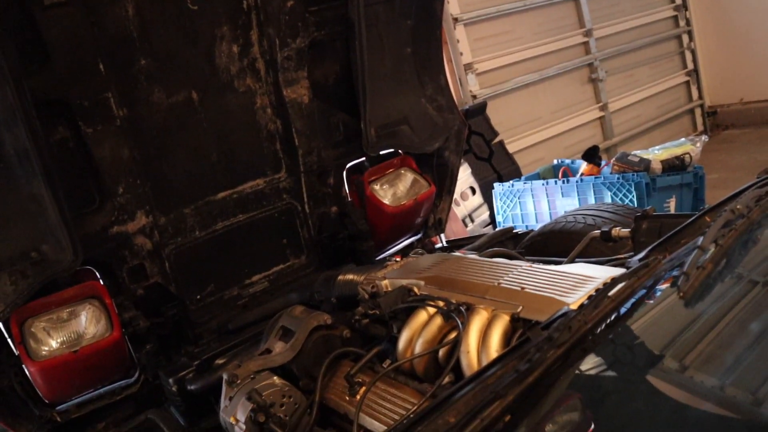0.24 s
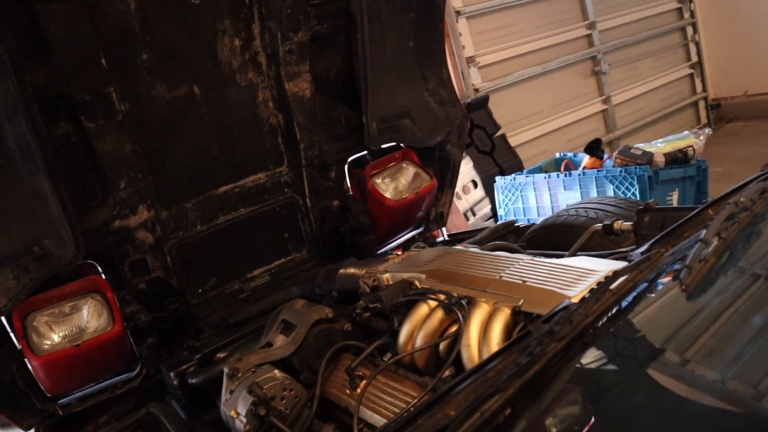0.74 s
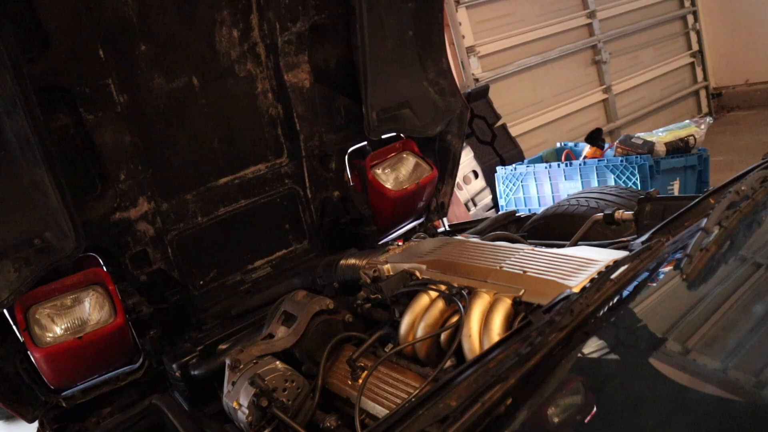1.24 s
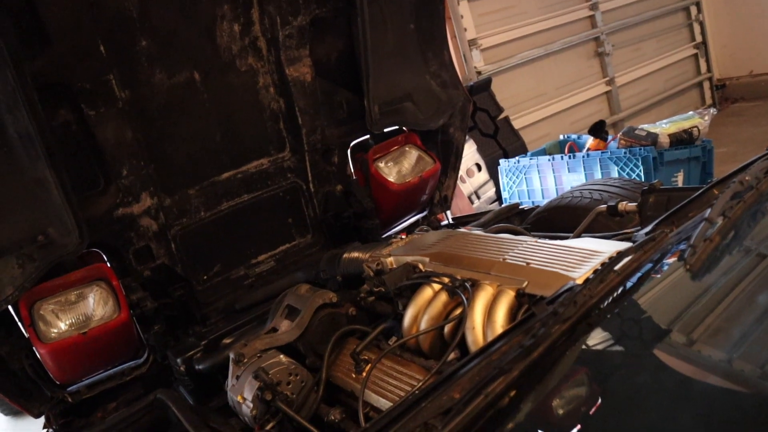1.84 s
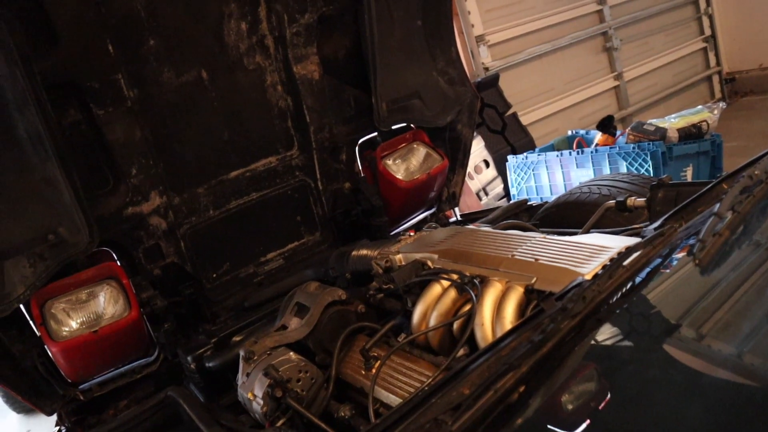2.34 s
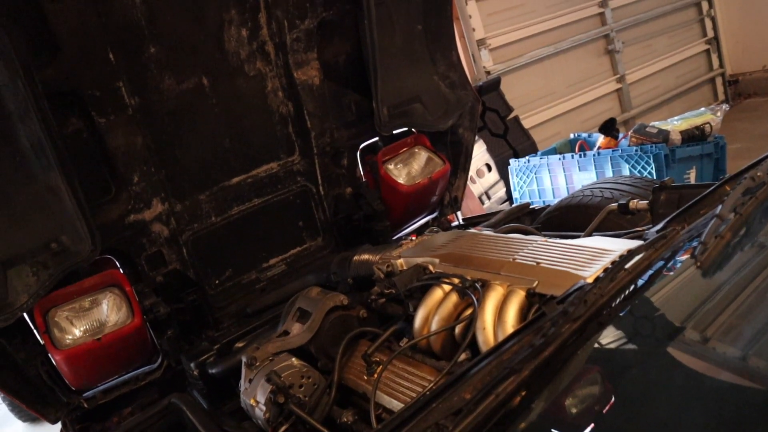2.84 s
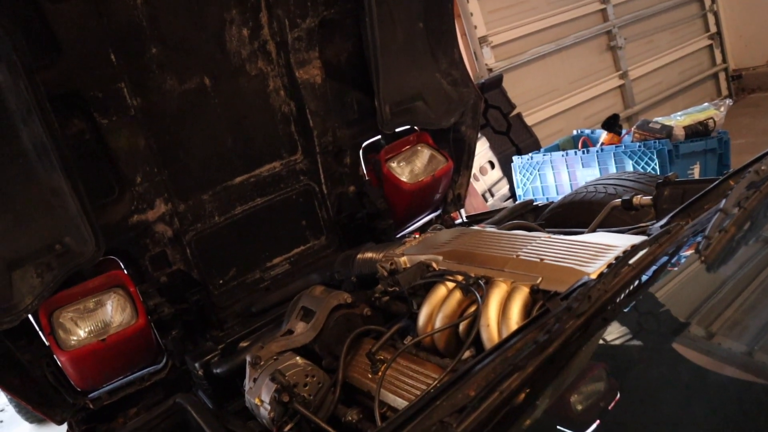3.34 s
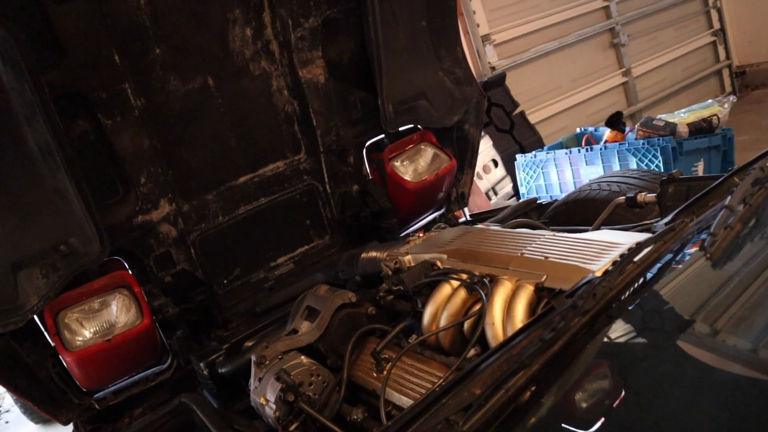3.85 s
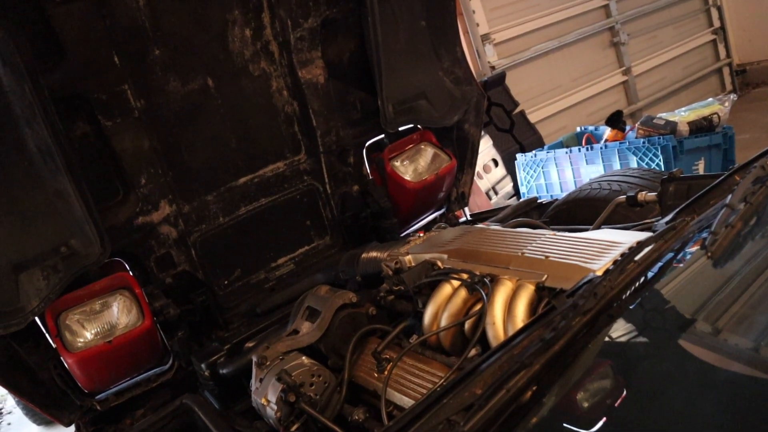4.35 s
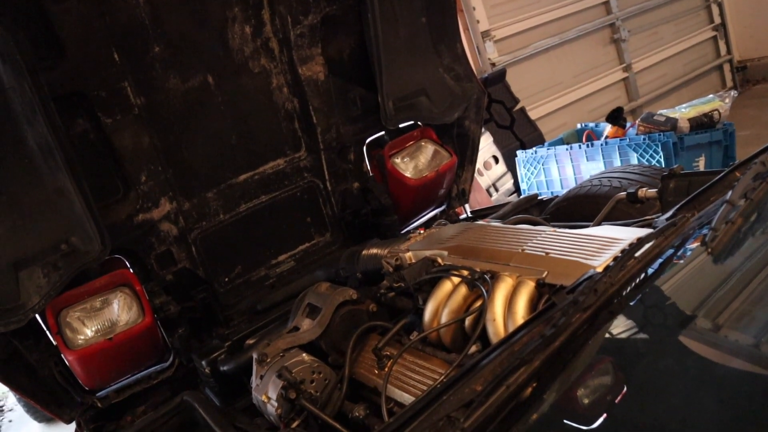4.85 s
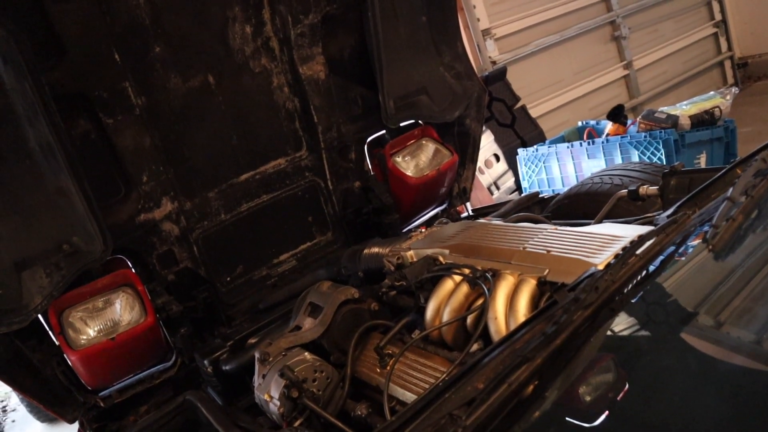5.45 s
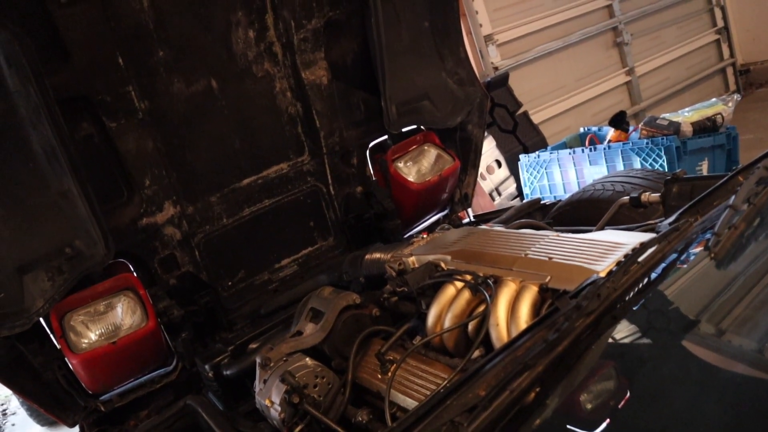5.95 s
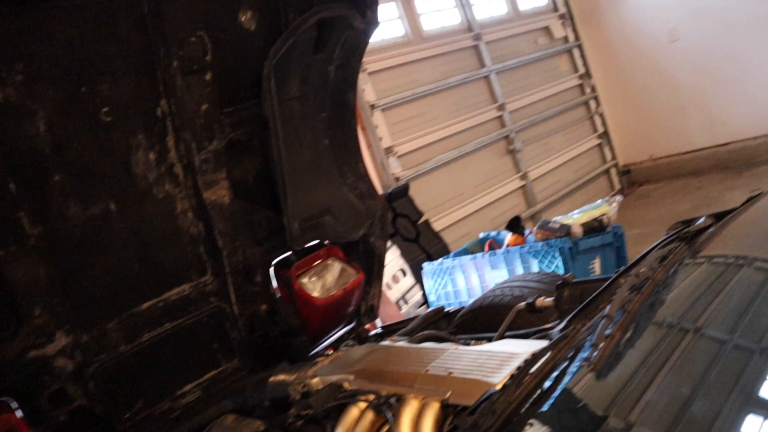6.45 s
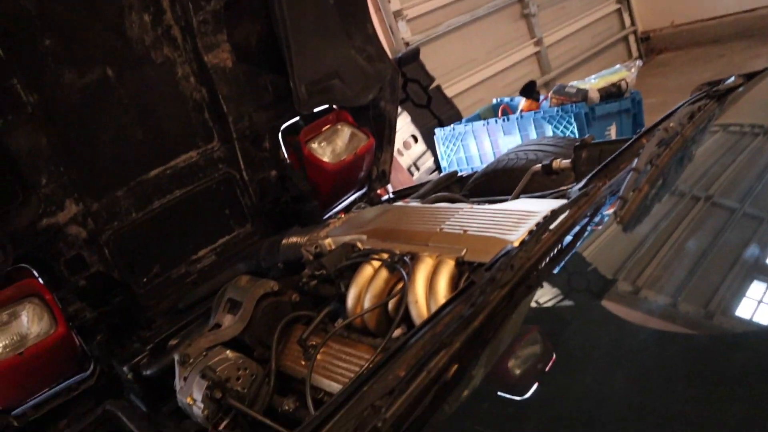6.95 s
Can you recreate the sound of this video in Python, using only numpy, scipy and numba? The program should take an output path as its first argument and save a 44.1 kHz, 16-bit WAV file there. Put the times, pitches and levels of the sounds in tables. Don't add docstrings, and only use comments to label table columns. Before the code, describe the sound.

A starter motor grinds and clanks harshly on a cold engine, lets go, then a nearby idling engine drones with fan roar and a chirping belt.

```python
import sys
import numpy as np
from scipy import signal
from scipy.fft import rfft, irfft, dct, next_fast_len
from scipy.io import wavfile
from scipy.ndimage import uniform_filter1d
from numba import njit

SR = 44100
rng = np.random.default_rng(int(sys.argv[2]) if len(sys.argv) > 2 else 0)


def natural_amplitude(level_db):
    exponent = np.asarray(level_db, float) / 20
    return 10 ** exponent


def master(y):
    cut = np.clip(np.atleast_2d(y).T, -1, 1)
    pcm = np.round(cut * 32767)
    wavfile.write(sys.argv[1], SR, pcm.astype(np.int16))


N = 317520
T = np.arange(N) / SR

# start_s, peak_db
SLAMS = [(0.017, -26.5), (0.153, -2), (0.207, -6.5), (0.2749, -6.5), (0.336, -15), (0.401, -17.5),
         (0.457, -26), (0.5655, -6.5), (0.6032, -22.5), (0.6415, -5.5), (0.718, -10.5), (0.77, -9.5),
         (0.8362, -35), (0.8945, -7), (0.937, -4.5), (0.979, -8.5), (1.011, -12), (1.044, -18),
         (1.1427, -2.5), (1.198, -5.5), (1.214, -15), (1.253, -16), (1.2987, -5.5), (1.3732, -9),
         (1.4465, -13.5), (1.504, -18), (1.607, -13.5), (1.645, -21), (1.692, -10), (1.718, -14.5),
         (1.787, -9.5), (1.805, -12)]
# time_s, rattle_db
EFFORT = [(0.0, -17), (0.144, -18), (0.154, -20), (.3, -19.5), (.42, -19.5), (.46, -21), (0.546, -21.5),
          (0.66, -19), (.8, -22.5), (.83, -24.5), (0.922, -27.5), (0.936, -23), (1.13, -23.5),
          (1.398, -23.5), (1.58, -23), (1.68, -23.5), (1.75, -26.5), (1.83, -27.5)]
# time_s, pitch_hz, level_db
WHINE = [(0, 600, -33), (.2, 541.7, -43), (.35, 559, -34), (.45, 560, -37.5), (.55, 500, -37.5),
         (.75, 591, -39.5), (1.0, 568.6, -38.5), (1.27, 608.5, -44.5), (1.305, 593, -27.5),
         (1.34, 556.6, -31.5), (1.37, 526, -34), (1.42, 519.5, -37.5), (1.5, 521, -39),
         (1.55, 471.5, -42.5), (1.61, 450, -36.5), (1.68, 383.5, -39), (1.85, 320, -58)]
# pitch_hz, width_hz, level_db
HOUSING = [(557, 120, -4.5), (930, 110, -2.5), (1240, 25, -30), (1713, 85, -7.5), (2144, 92, -4.5),
           (2408, 110, 1), (2640, 117, 1.5), (2827, 98, -0.5), (3180, 170, -1), (3485, 100, -2),
           (3950, 52, -0.5), (4080, 99, -5)]
# frequency_hz, density_db (per Hz)
RATTLE_MID = [(25, -30), (50, -15), (95, -5), (150, 1), (291, -2), (415, -4.5), (548, -2), (871, 1.5),
              (1030, -5.5), (1300, 2.5), (2130, 1.5), (4210, 0.5), (6000, -11), (7800, -26), (9500, -25),
              (12000, -32), (14000, -88)]
RATTLE_SIDE = [(88, -66), (150, -60), (426, -15.5), (559, -13), (924, -8.5), (998, -11.5), (1500, 2),
               (1930, -4), (2380, 2), (3510, 6), (11400, -24), (15300, -41.5)]
# start_s, level_db, pitch_hz
RINGS = [(.155, -30, 762), (.22, -31, 882), (.29, -35, 847), (.33, -27, 564), (.39, -30, 930),
         (.64, -28, 858), (.70, -30, 604), (.936, -27, 871), (.985, -32, 520.3), (1.146, -23.5, 854),
         (1.2, -29, 740), (1.691, -33.5, 930), (1.78, -30.5, 780), (.155, -24.5, 2120), (.155, -31, 4290),
         (.21, -24, 1286), (.23, -28, 2030), (.40, -36, 3485), (0.646, -26, 4080), (.645, -23, 3590),
         (.65, -44, 1350), (.98, -25, 1987), (1.146, -38, 4240), (1.145, -28.5, 3450), (1.15, -24, 1313),
         (1.209, -24.5, 1287), (1.3, -28, 2456), (1.32, -24, 3460), (1.3, -24, 2574), (1.37, -22.5, 2105),
         (1.41, -26, 2100), (1.2, -30, 2580), (1.25, -28.5, 2440), (1.39, -26, 3150), (1.43, -29, 3070),
         (1.51, -29, 2770), (1.6, -32, 2150), (1.61, -27, 4210), (1.69, -33, 4300), (.02, -26.5, 2380),
         (.24, -33, 2123), (.27, -26, 3990), (.46, -27.5, 3980), (.71, -27, 4230), (.94, -27.5, 1390),
         (1.701, -27, 1312)]
# start_s, level_db, pitch_hz, t60_s
THUMPS = [(.072, -20, 50, 0.17), (.105, -22, 144, .12), (.148, -13.5, 55, 0.13), (.195, -18, 64.3, .14),
          (.24, -23, 90, .1), (.497, -16, 60, .1), (.51, -23, 140, .14), (.535, -25, 50, .1),
          (.575, -18.5, 58, .14), (.62, -18, 60, 0.14), (.67, -26, 55, .1), (.73, -24.5, 60.2, 0.11),
          (.88, -25, 50, .15), (.89, -27, 130, .12), (.935, -23, 59, .12), (.99, -19, 52, .12),
          (1.025, -18.5, 62, .13), (1.11, -19.5, 50, .12), (1.14, -22, 140, 0.15),
          (1.175, -25.5, 189, 0.12), (1.21, -21, 60, .14), (1.255, -26, 75, .12), (1.33, -28, 69.6, .12),
          (1.37, -34, 65, 0.11), (1.5, -27, 55, .1)]
# start_s, peak_db, pitch_hz
BLOWS = [(0.123, -21.5, 297), (0.209, -25, 238), (0.397, -25, 298), (0.477, -31, 291), (0.51, -30.5, 148),
         (0.546, -29, 153), (0.594, -28, 218), (0.702, -29, 277), (0.936, -24, 284), (0.979, -22.5, 287),
         (1.068, -26.5, 265), (1.135, -23.5, 190), (1.247, -29, 299), (1.388, -27.5, 463)]
# time_s, firing_hz
IDLE = [(1.25, 42.2), (1.75, 42.05), (2.72, 43.64), (3.8, 43.98), (3.87, 43), (4.05, 43.74), (4.4, 45.05),
        (4.53, 44.62), (4.72, 44.82), (5.61, 42.26), (5.92, 42.46), (6.55, 43.84), (7.2, 44.08)]
# time_s, level_db
LOAD = [(0, -1), (1.2, -3.5), (1.4, 0.5), (1.55, -4), (1.78, -8), (1.88, -2), (2.2, 2), (2.5, 3.5),
        (3.6, 0.5), (4.1, 1.5), (4.35, -3), (4.8, 0), (5.2, -3), (6, -0.5), (7.2, -0.5)]
CYLINDER_DB = [4.5, -1, 5.5, 1, 5, 6, -2, 6]
# multiple (of the firing_hz), level_db
PARTIALS = [(5, -42), (6, -43), (8, -41), (9, -38), (10, -45), (14, -46)]
# pitch_hz, width_hz, level_db
EXHAUST = [(210, 22, 0.5), (258.7, 8.2, -0.5), (330.2, 21, 5), (395.5, 22.7, 2.5), (599, 4.4, -5.5)]
# frequency_hz, density_db (per Hz)
ROAR_MID = [(18, -52), (30, -18), (75, -5.5), (102, -8), (129, -3.5), (177, -8.5), (391, -11.5),
            (475, -14.5), (828, -15.5), (2170, -27), (3060, -30.5), (5000, -37), (6500, -44.5),
            (11000, -120)]
ROAR_SIDE = [(35, -75), (60, -49), (125, -28), (200, -19), (420, -2.5), (494, 5), (609, 7.5), (1990, 3.5),
             (3010, 3.5), (3380, -0.5), (5770, -4.5), (7610, -1.5), (8750, -3.5), (10000, -7),
             (12500, -12.5), (15300, -26)]
# phase_cycles, strength_ratio, lowest_hz (where the squeal drops to)
SLIP_CYCLE = [
    (0.01, 1.2, 7100),
    (0.351, 0.82, 7485),
    (.7, 0.23, 7550),
]
# start_s, level_db, centre_hz, width_hz
SCUFFS = [
    (3.322, -41, 1700, 1200),
    (4.254, -45, 4340, 4020),
    (4.628, -31, 1801, 1000),
    (4.63, -38, 700, 500),
    (4.95, -47, 698.6, 797),
    (5.029, -49, 801.6, 800),
]
# start_s, level_db, pitch_hz, t60_s
KNOCKS = [(6.6, -43, 2450, 0.31), (6.81, -44, 3400, .1), (6.86, -45, 3570, 0.37), (7.0, -47, 5000, 0.27),
          (7.0, -44, 2380, 0.22), (7.0, -43, 3560, .4), (7.115, -37, 3550, 0.4), (7.165, -37, 3550, 0.5),
          (7.08, -39, 2400, .4), (7.115, -36.5, 2385, 0.3), (6.545, -37, 2500, .15),
          (7.135, -39, 1500, .12), (5.1, -40, 5600, .2)]
# frequency_hz, mid_db, side_db
FAINTEST = [(102, -20, -3.5), (303, -20.5, -13.5), (1503, -10, -8.5), (3150, -10, -5), (4500, -8, -6),
            (5580, -4.5, -7), (7720, -10, -12), (8840, 1, -7), (9400, 1.5, -5), (10420, -3.5, -7),
            (10880, -4, -8), (13570, -1.5, -6.5), (15400, 2, 8)]

RELEASE_S, FREEWHEEL_S = 1.806, 1.1
USUAL_DB, USUAL_HZ = -23, 43.5
GARAGE_T60_S = 0.78
FRAME, FRAME_START = 1024, 664


def curves(table):
    s, *columns = np.transpose(table)
    return [np.interp(T, s, column) for column in columns]


def level(x, db):
    return np.asarray(x) * natural_amplitude(db) / np.sqrt(np.mean(np.atleast_2d(x)[0] ** 2))


def noise(rows):
    return rng.standard_normal((rows, N))


def placed(x, side):
    return x * np.array([[1], [side]])


def above(x, hz, order):
    return signal.sosfilt(signal.butter(order, hz, "high", fs=SR, output="sos"), x)


def colour(x, points):
    hz, db = np.transpose(points)
    size = next_fast_len(N)
    log_hz = np.log(np.arange(size // 2 + 1) * SR / size + 1)
    gain = natural_amplitude(np.interp(log_hz, np.log(hz), db))
    return irfft(rfft(x, size) * gain, size)[:N]


def pair(rows, mid_points, side_points, mid_db, side_db, centre_db):
    side, twin = level([colour(row, side_points) for row in rows[1:]], side_db)
    mid = level(colour(rows[0], mid_points), mid_db) + natural_amplitude(centre_db) * above(twin, 5600, order=4)
    return np.array([mid, side])


@njit
def svf(x, hz, width):
    y, band, low = np.empty(len(x)), 0., 0.
    for i in range(len(x)):
        g, k = np.tan(np.pi * hz[i] / SR), width / hz[i]
        v = (band + g * (x[i] - low)) / (1 + g * (g + k))
        band, low, y[i] = 2 * v - band, low + 2 * g * v, k * v
    return y


def walk(rate):
    hold = max(int(SR / rate / 32), 1)
    slow = np.repeat(rng.standard_normal(N // 32 // hold + 2), hold)
    slow = uniform_filter1d(uniform_filter1d(slow, hold), hold)
    return .79 * np.interp(T, np.arange(len(slow)) * 32 / SR, slow)


def modes(x, table, flicker_db, rate):
    out = 0
    for hz, width, db in table:
        mode = signal.lfilter(*signal.iirpeak(hz, hz / width, SR), x)
        out = out + natural_amplitude(db + flicker_db * walk(rate)) * mode
    return out


def puffs(times, sizes, rise_s, fall_s):
    at = np.clip(np.asarray(times) * SR, 0, N - 1).astype(int)
    kicks = np.bincount(at, weights=sizes, minlength=N)

    def fade(rate):
        return signal.lfilter([1], [1, -np.exp(-rate / SR)], kicks)

    return fade(1 / fall_s) - fade(1 / fall_s + 1 / rise_s)


def ring(table, rise_s):
    out, age = np.zeros(N + SR), T[:SR]
    for s, db, hz, t60 in table:
        at = int(max(s, 0) * SR)
        envelope = natural_amplitude(db - 60 * age / t60) * (1 - np.exp(-age / rise_s))
        out[at:at + SR] += envelope * np.sin(2 * np.pi * hz * age)
    return out[:N]


def garage(x, wet_db):
    t = T[:SR]
    tail = rng.standard_normal((2, SR)) * natural_amplitude(-60 * t / GARAGE_T60_S) * (1 - np.exp(-t / 0.033))
    dull = signal.lfilter([.45], [1, -.55], tail)
    tail = dull + (tail - dull) * np.exp(-t / 0.051)
    tail = tail / np.sqrt(np.sum(tail[0] ** 2))
    return x + natural_amplitude(wet_db) * signal.fftconvolve(x, tail, axes=1)[:, :N]


def gear_mesh():
    rattle_db = curves(EFFORT)[0]
    effort = rattle_db - USUAL_DB
    treble_db = -34.5 + 0.61 * effort - 1.45 * T + 0.59 * walk(14.44)
    growl_db = -29 + 0.96 * effort - 1.6 * T + 5.1 * walk(15.84)
    growl_db = growl_db - 19 * np.maximum(T - FREEWHEEL_S, 0)
    s, peak_db = np.transpose(SLAMS)
    slam = 1 + puffs(s, natural_amplitude(peak_db + 13), rise_s=0.004, fall_s=0.034)
    teeth = noise(3) * natural_amplitude(2.02 * rng.exponential(size=(3, N))) * slam
    teeth = teeth * natural_amplitude(1.5 * walk(110))
    ringing = []
    for row in teeth:
        housing = modes(row, HOUSING, flicker_db=6.5, rate=22)
        ringing.append(level(row, 0.67) + level(housing, -10.0))
    gear = pair(np.array(ringing), RATTLE_MID, RATTLE_SIDE, mid_db=-0.37, side_db=3.0, centre_db=-7.0)
    low = signal.sosfilt(signal.butter(2, 1300, fs=SR, output="sos"), gear)
    high = above(gear, 6000, order=2)
    middle = gear - low - high
    treble = high * slam ** .1 * natural_amplitude(treble_db + 21.5)
    gear = middle * natural_amplitude(rattle_db - 3.0) + low * natural_amplitude(growl_db + 3.0) + treble
    return gear * np.clip((RELEASE_S - T) / 0.031, 0, 1)


def armature():
    hz, whine_db = curves(WHINE)
    brushes = level(svf(noise(1)[0], hz, 60.0), -2.0)
    tone = np.sin(2 * np.pi * np.cumsum(hz * (1 + 0.0061 * walk(29.84))) / SR)
    return (brushes + 0.4 * tone) * natural_amplitude(whine_db) * (T < WHINE[-1][0])


def compressions():
    blows = [(s, db - 1, hz, 0.13) for s, db, hz in BLOWS]
    return ring(THUMPS, rise_s=0.0065) + ring(blows, rise_s=0.004)


def starter():
    rings = ring([(s, db, hz, 0.22) for s, db, hz in RINGS], rise_s=0.0038)
    metal = gear_mesh() + placed(rings, .4) + placed(armature(), .4)
    return garage(metal, wet_db=-5.0) + placed(compressions(), .01)


def exhaust_drone(hz, turns):
    second_db = -32.5 + 1.8 * (hz - USUAL_HZ) + 3.1 * walk(17)
    dead_db = -8 * np.exp(-((3 * hz - 135.9) / 2.3) ** 2)
    third_db = -26 + curves(LOAD)[0] + dead_db + 1.8 * walk(12)
    second = natural_amplitude(second_db) * np.sin(4 * np.pi * turns)
    third = natural_amplitude(third_db) * np.sin(6 * np.pi * turns + 1.45)
    drone = np.sqrt(2) * (second + third)
    drone = drone + natural_amplitude(-36 + 4.5 * walk(7)) * np.sin(7 * np.pi * turns)
    for k, db in PARTIALS:
        drone = drone + natural_amplitude(db + 4 * walk(5)) * np.sin(2 * np.pi * k * turns + k)
    return drone


def exhaust_pipes(turns, size):
    gas = noise(1)[0] * (0.4 + size * np.exp(-(turns % 1) / 0.26))
    boom = level(modes(gas, EXHAUST, flicker_db=0.0, rate=6), 0.36)
    return boom * natural_amplitude(-37.5 + 0.88 * walk(5.7))


def fan_roar(size):
    air = noise(3) * (1 + 0.11 * size) * natural_amplitude(0.83 * walk(3.78))
    roar = pair(air, ROAR_MID, ROAR_SIDE, mid_db=-27.5, side_db=-33, centre_db=-7.0)
    whistles = [(3070, 26, 1), (1490, 54.8, -4)]  # pitch_hz, width_hz, level_db
    pulley = np.array([level(modes(row, whistles, flicker_db=2, rate=8.8), -51) for row in air[:2]])
    turned = np.clip((T - 6.3) / 0.16, 0, 1)
    body = signal.sosfilt(signal.butter(1, [300, 1000], "band", fs=SR, output="sos"), roar)
    return roar + (natural_amplitude(turned) - 1) * body + pulley * natural_amplitude(-5 * turned)


def idling():
    hz = curves(IDLE)[0]
    turns = np.cumsum(hz) / SR
    fired = turns.astype(int)
    size = natural_amplitude(np.array(CYLINDER_DB)[fired % 8] + 4 * rng.uniform(-1, 1, size=400)[fired])
    drone = placed(exhaust_drone(hz, turns), .008)
    pipes = placed(exhaust_pipes(turns, size), .04)
    return drone + pipes + fan_roar(size)


def belt():
    turns = np.cumsum(curves(IDLE)[0]) / SR
    cycles = (turns - np.interp(2.043, T, turns)) / 8
    share, strength, low_hz = np.tile(np.transpose(SLIP_CYCLE), 39)
    whole = np.arange(len(share)) // len(SLIP_CYCLE) - 10
    late, uneven, deeper = rng.standard_normal((3, len(share)))
    s = np.interp(whole + share, cycles, T) + 0.0042 * late
    size = np.minimum(strength * natural_amplitude(3.5 * uneven), 1.6)
    drop_hz = (7800 - low_hz - 110 * deeper) * 1.67
    hz = 7800 - puffs(s, drop_hz, rise_s=0.0092, fall_s=0.04) + 100 * walk(30)
    hz = np.clip(hz, 6550, 9000)
    grip = natural_amplitude(2.4 * walk(150))
    rub = noise(2) * (0.42 + puffs(s, size, rise_s=0.0011, fall_s=0.044)) * grip
    squeal = np.array([svf(svf(row, hz, 750.0), hz, 750.0) for row in rub])
    span_hz = 7950 + 150 * walk(34)
    free = noise(2) * grip
    span = np.array([svf(svf(row, span_hz, 450.), span_hz, 450.) for row in free])
    overtone = np.array([svf(row, 1.47 * hz, 1600.0) for row in free + 0.59 * rub])
    spit = noise(2) * puffs(s, size * strength, rise_s=0.006, fall_s=0.031)
    octave = [svf(row, np.minimum(2 * hz, 16000.), 900.) for row in spit]
    tick = level(above(spit, 9600, order=2), -56.5) + level(octave, -65.5)
    chirp = level(squeal, -41) + level(span, -44.0) + tick
    wider = np.array([[0], [8.5]])  # dB, mid and side
    overtone_wider = np.array([[0], [4.5]])
    return chirp * natural_amplitude(wider) + level(overtone, -49) * natural_amplitude(overtone_wider)


def scuffs():
    rub = noise(2)
    out = 0
    for s, db, hz, width in SCUFFS:
        band = np.array([svf(row, np.full(N, 1. * hz), 1. * width) for row in rub])
        out = out + 3 * natural_amplitude(db) * puffs([s], [1], rise_s=0.0035, fall_s=0.043) * band
    return out


def knocks():
    return placed(ring(KNOCKS, rise_s=0.0015), .6)


def camera_db():
    ducked = np.maximum(-13 - 1.8 * T, -16)
    db = ducked + 6.2 * np.maximum(T - 2.323, 0)
    return uniform_filter1d(np.minimum(db, 2), size=22050)


def scene():
    handling = garage(knocks() + scuffs(), wet_db=-13.5)
    mid, side = starter() + handling + natural_amplitude(camera_db()) * (idling() + belt())
    mid = mid + 0.055 * side
    side = above(side, 65, order=2) + 0.18 * above(mid, 450, order=2)
    return np.array([mid + side, mid - side])


def steps(lines, least):
    step = least / .6 + 1e-12
    return np.sign(lines) * step * np.floor(np.abs(lines) / step + .4)


def thin(mid, side):
    window = signal.windows.kaiser_bessel_derived(2 * FRAME, 4 * np.pi)
    lead, count = 2 * FRAME - FRAME_START, N // FRAME + 3
    at = FRAME * np.arange(count)[:, None] + np.arange(2 * FRAME)
    padded = np.pad([mid, side], ((0, 0), (lead, 4 * FRAME)))
    a, b, c, d = np.split(padded[:, at] * window, 4, axis=2)
    lines = dct(np.dstack([-c[..., ::-1] - d, a - b[..., ::-1]]), type=4, norm="ortho")
    band = np.sqrt(np.mean(lines[1].reshape(count, -1, 32) ** 2, axis=2))
    top = np.log(band.max(axis=1, keepdims=True) + 1e-9)
    band = band + natural_amplitude(-24.5) * np.exp(uniform_filter1d(top, size=9, axis=0))
    uneven = np.clip(np.arange(band.shape[1]) / 13, .2, 1) ** 2
    waver = 1.8 * rng.standard_normal(band.shape) + 2.6 * rng.standard_normal((count, 1))
    band = np.repeat(band * natural_amplitude(uneven * waver), FRAME // band.shape[1], axis=1)
    hz, mid_db, side_db = np.transpose(FAINTEST)
    line_hz = np.arange(FRAME) * SR / 2 / FRAME
    least = band * natural_amplitude(np.array([[np.interp(line_hz, hz, db)] for db in (mid_db, side_db)]))
    u, v = np.split(dct(steps(lines, least), type=4, norm="ortho"), 2, axis=2)
    frames = np.dstack([v, -v[..., ::-1], -u[..., ::-1], -u]) * window
    out = frames[:, 1:, :FRAME] + frames[:, :-1, FRAME:]
    return out.reshape(2, -1)[:, lead - FRAME:lead - FRAME + N]


def top_cut(x):
    return signal.sosfilt(signal.butter(12, 15420, fs=SR, output="sos"), x)


def record(dry):
    left, right = .88 * np.tanh(dry / .88)
    mid, side = thin((left + right) / 2, (left - right) / 2)
    return top_cut(np.array([mid + side, mid - side]))


dry = scene()
out = record(dry)
master(out)
```